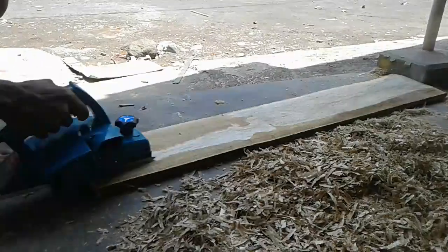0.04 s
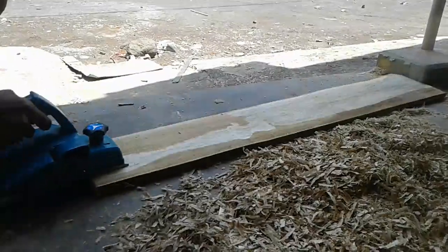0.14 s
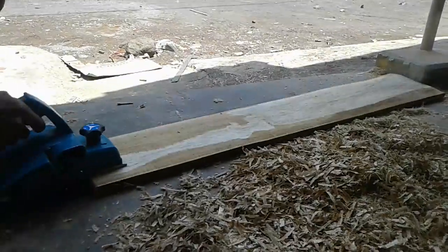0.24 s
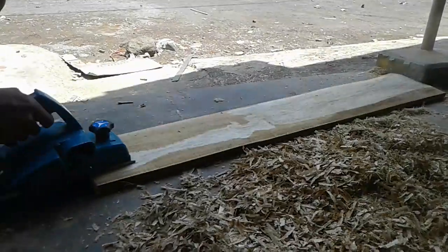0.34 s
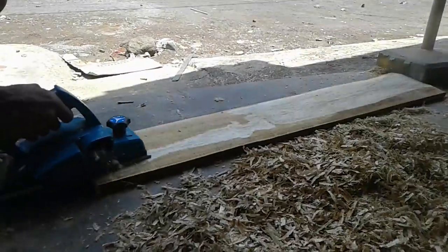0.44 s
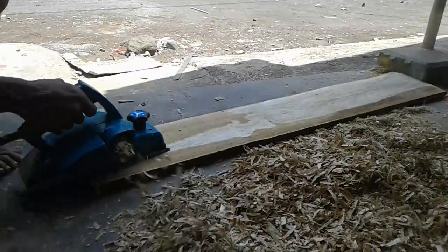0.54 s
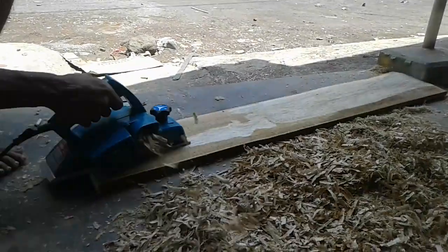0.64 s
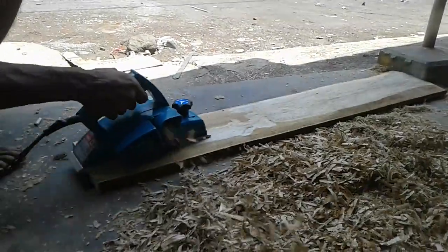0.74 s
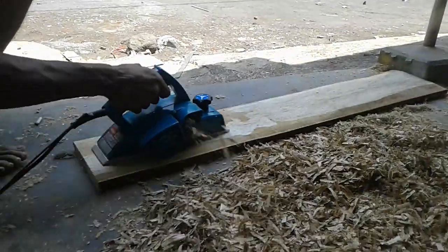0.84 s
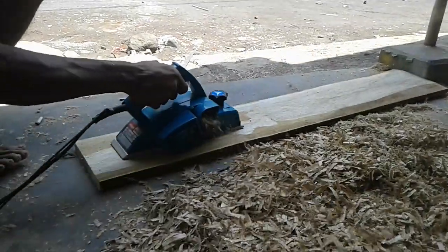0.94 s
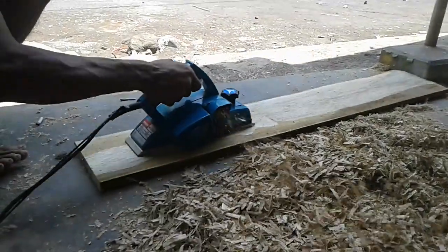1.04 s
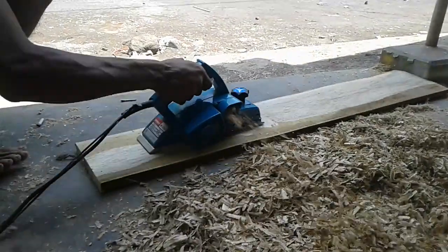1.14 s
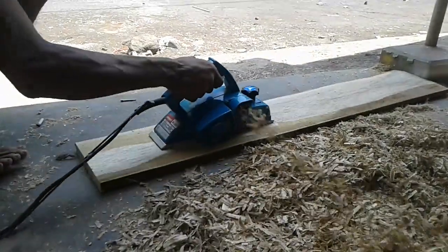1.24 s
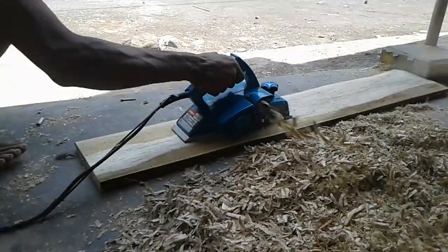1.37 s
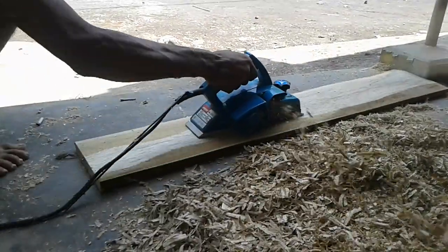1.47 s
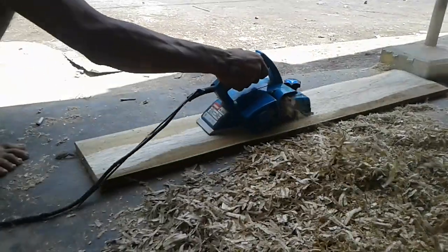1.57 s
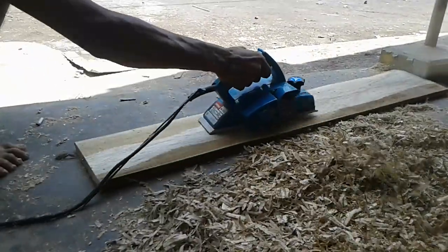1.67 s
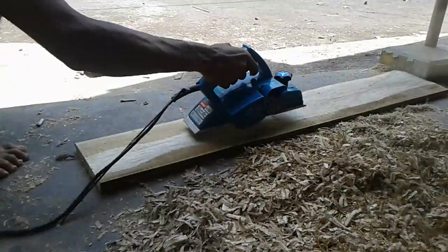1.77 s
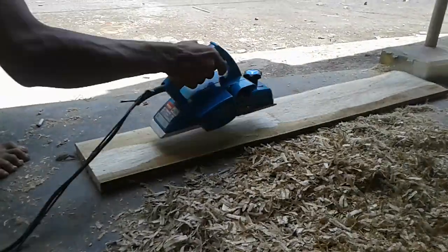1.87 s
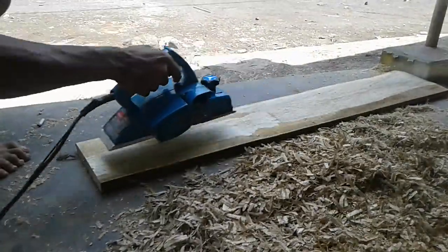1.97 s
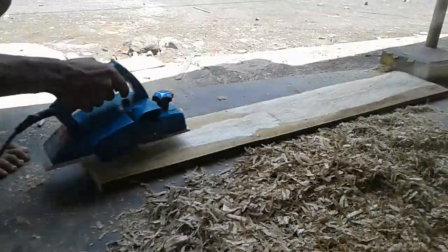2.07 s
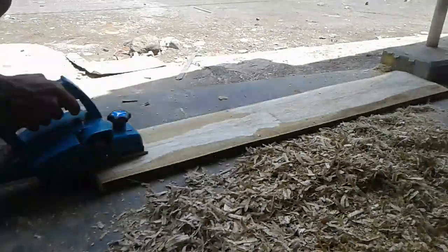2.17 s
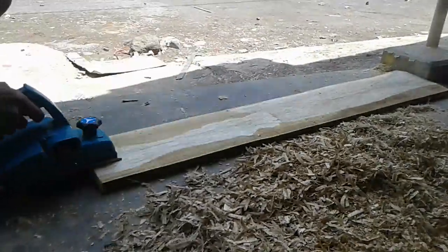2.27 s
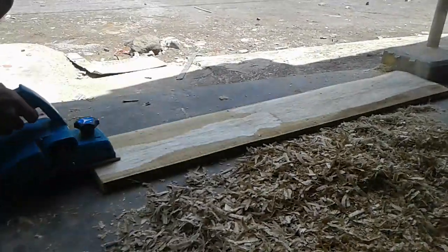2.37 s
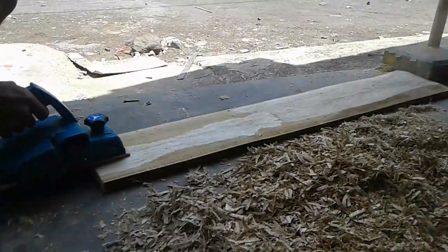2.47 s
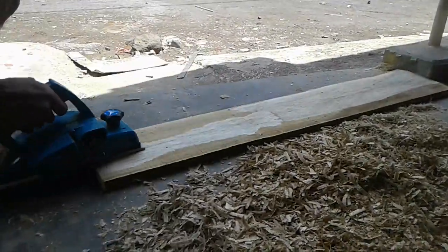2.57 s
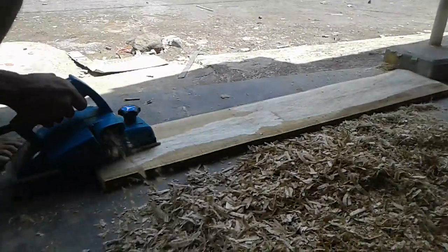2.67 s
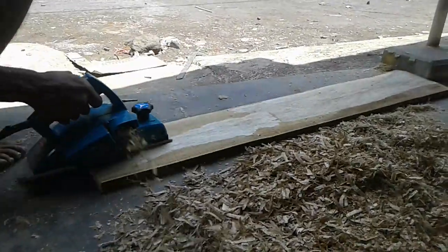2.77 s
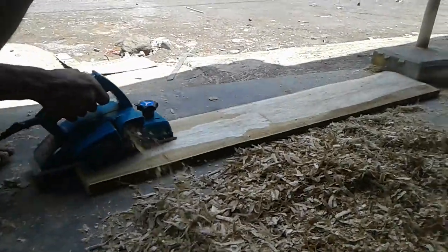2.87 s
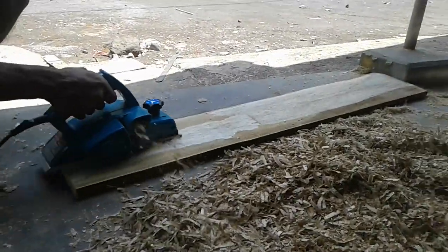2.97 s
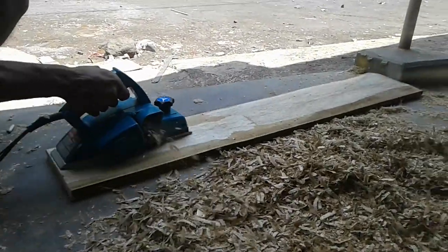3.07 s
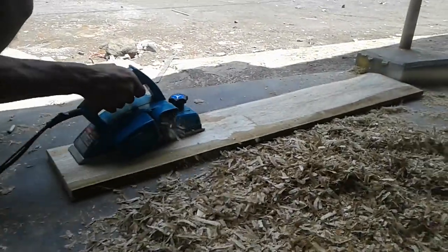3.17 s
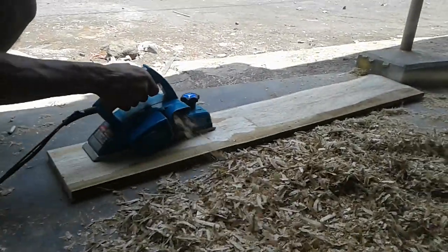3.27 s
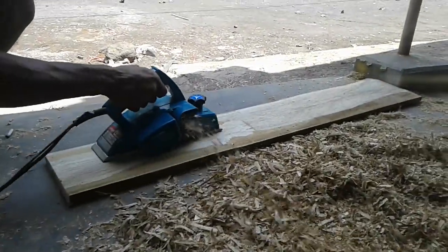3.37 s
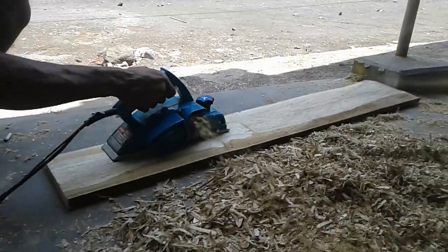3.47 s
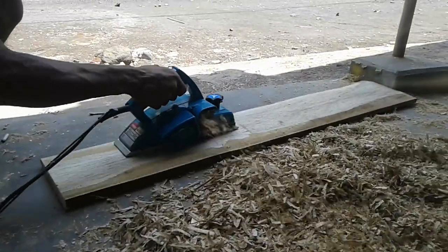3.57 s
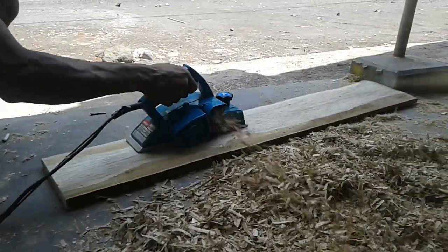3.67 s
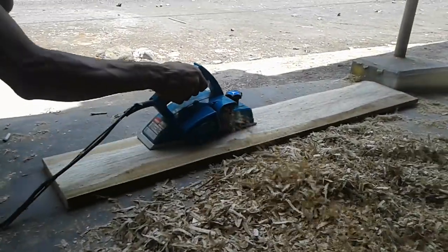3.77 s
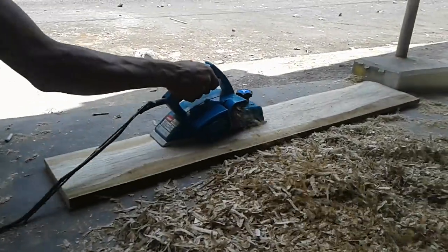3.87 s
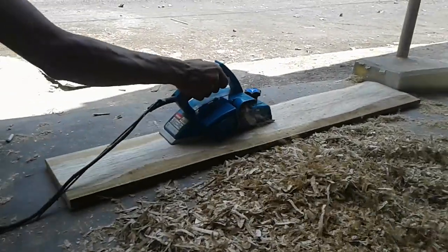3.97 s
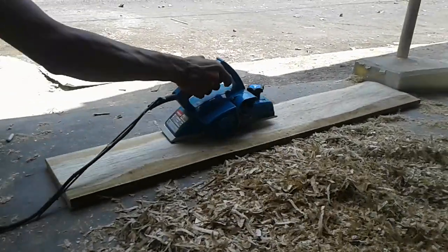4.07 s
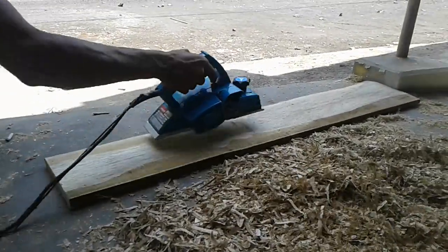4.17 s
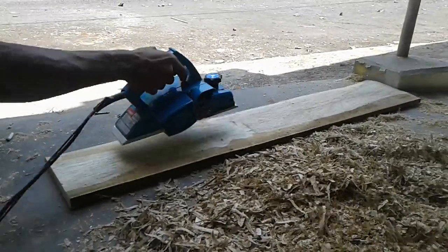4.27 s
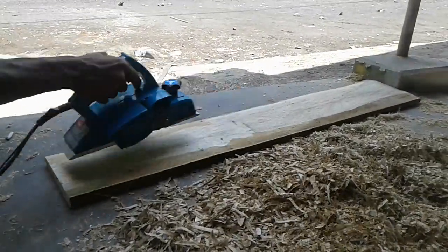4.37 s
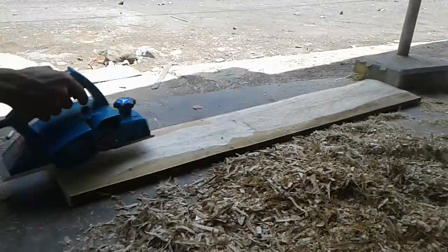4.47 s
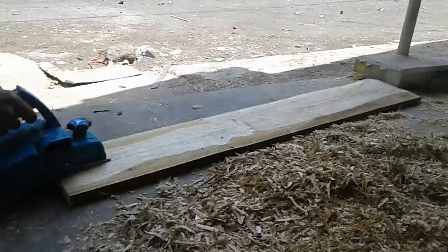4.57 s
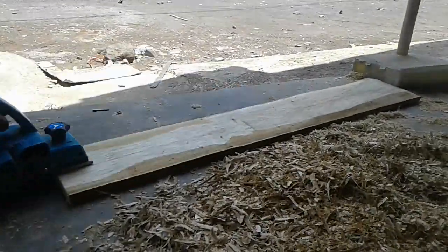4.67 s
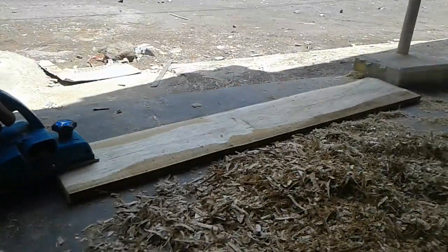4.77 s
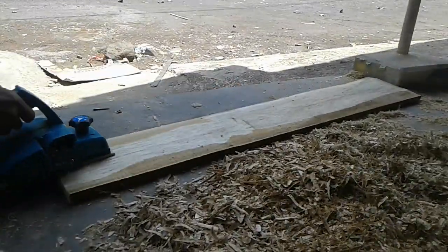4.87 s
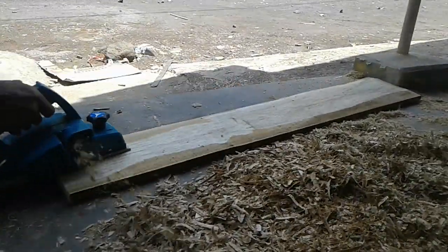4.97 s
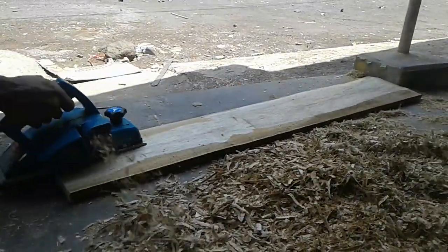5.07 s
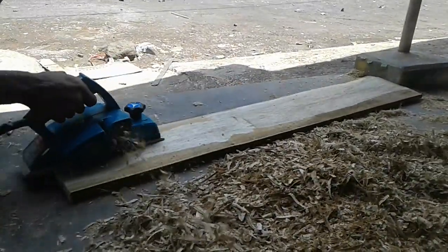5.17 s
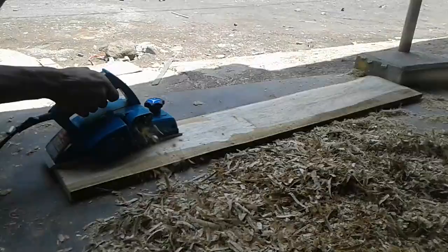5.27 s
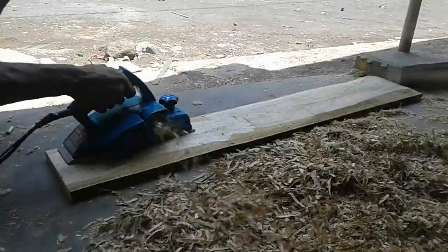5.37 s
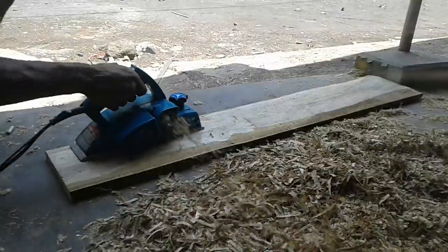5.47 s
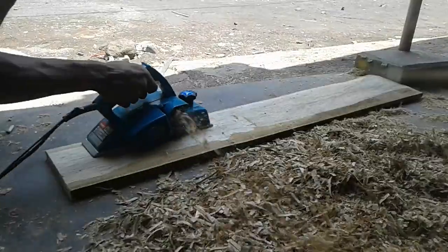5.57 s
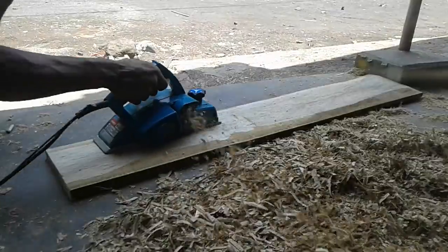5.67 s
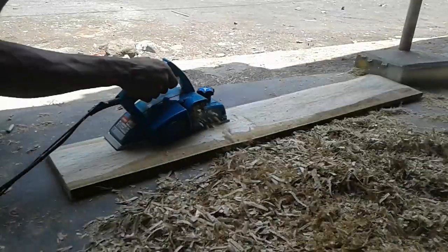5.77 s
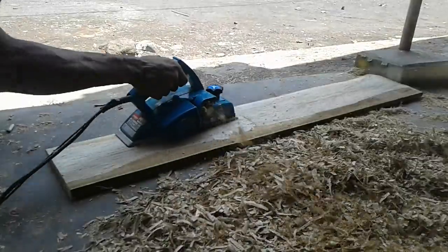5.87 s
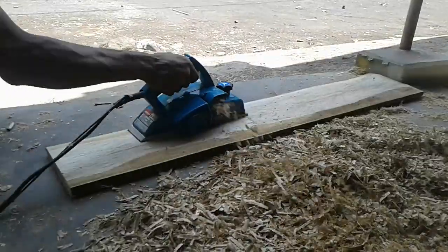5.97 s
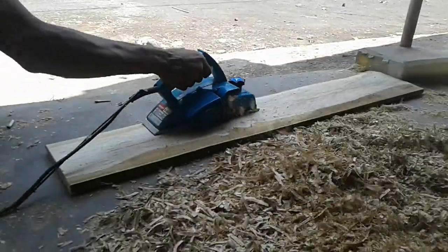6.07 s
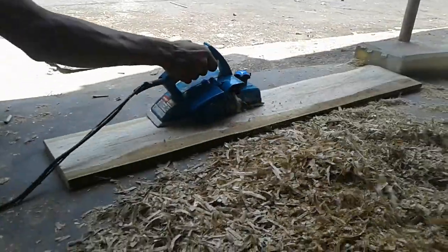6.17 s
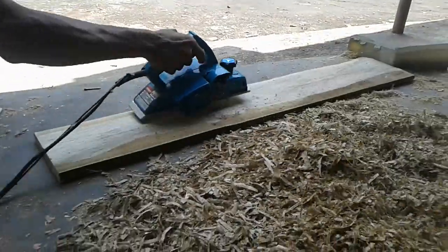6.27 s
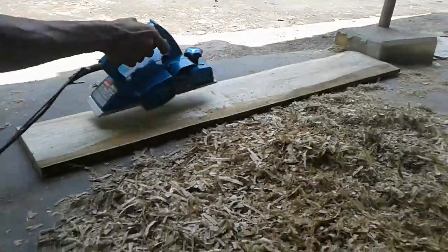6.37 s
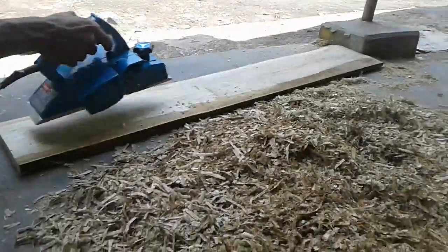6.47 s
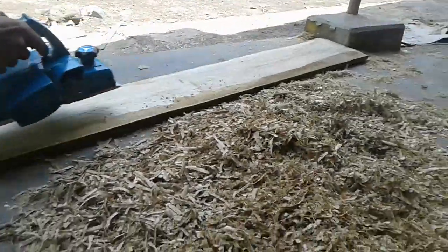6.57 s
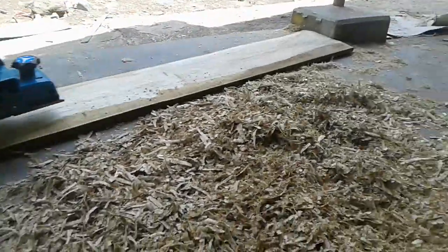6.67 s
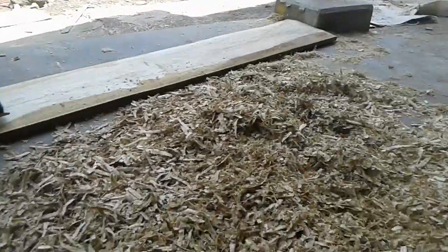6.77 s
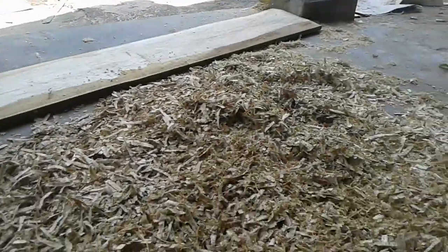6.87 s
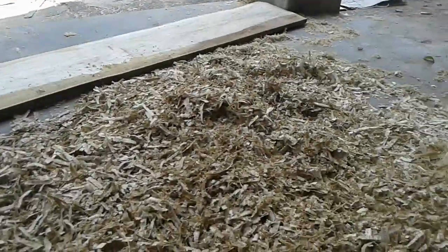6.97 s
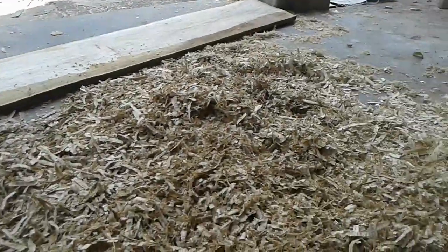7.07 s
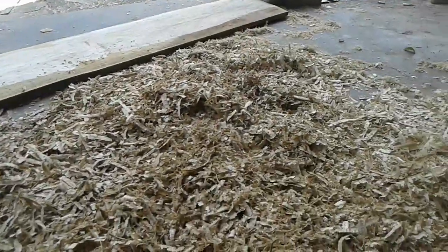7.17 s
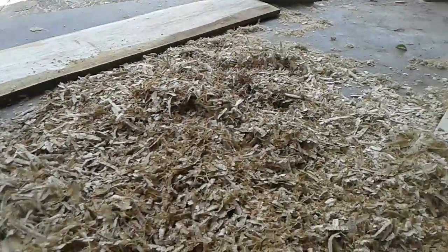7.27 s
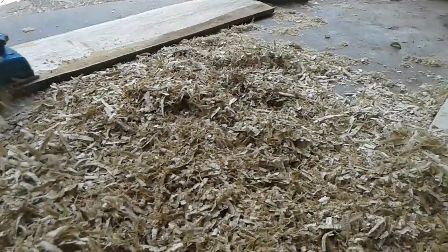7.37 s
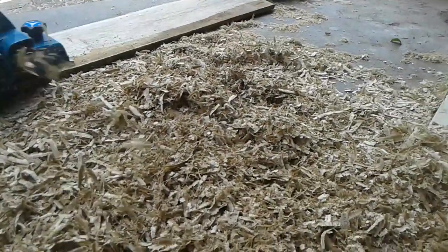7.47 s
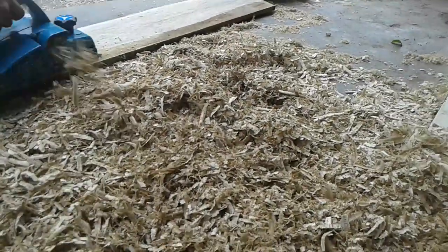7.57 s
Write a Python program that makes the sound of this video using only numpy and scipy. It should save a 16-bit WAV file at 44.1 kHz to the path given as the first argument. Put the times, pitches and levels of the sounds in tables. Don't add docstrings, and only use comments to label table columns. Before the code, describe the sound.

A hand-held power planer works along a loose wooden plank, recorded closely on a concrete porch. Each stroke starts with a quick high motor whine, then a sudden coarse roar of knives on wood with tearing fibres and spraying chips. Between strokes the drum coasts with a hollow hum, slowly falling; faint airy whistles rise before the second and third. The third cut bogs down in pitch. A distant engine approaches towards the end.

```python
import sys
import numpy as np
from scipy import signal
from scipy.fft import rfft, irfft, next_fast_len
from scipy.io import wavfile
from scipy.ndimage import uniform_filter1d

SR = 44100
rng = np.random.default_rng(int(sys.argv[2]) if len(sys.argv) > 2 else 0)


def amp(db):
    return 10 ** (np.asarray(db, float) / 20)


def write(x):
    x = np.atleast_2d(x).T
    wavfile.write(sys.argv[1], SR, np.round(np.clip(x, -1, 1) * 32767).astype(np.int16))


N = 336394
STEP = 40


def in_time(rows):
    s, *columns = np.transpose(rows)
    return [np.interp(np.arange(N) / SR, s, c) for c in columns]


def rms_one(x):
    return x / np.sqrt(np.mean(x ** 2) + 1e-20)


def slow_chance(rate, count):
    r = np.exp(-2 * np.pi * STEP * rate / SR)
    noise = rng.standard_normal((count, N // STEP + 2002))
    slow = signal.lfilter([1], [1, -2 * r, r * r], noise)[:, 2000:]
    return slow / np.std(slow, axis=1, keepdims=True)


def stretch(slow):
    between = np.arange(STEP, dtype=np.float32) / STEP
    return (slow[:-1, None] + np.diff(slow)[:, None] * between).ravel()[:N]


def drift(rate):
    return stretch(slow_chance(rate, count=1)[0])


def colour(x, spectrum):
    hz, db = np.transpose(spectrum)
    grid = np.maximum(np.arange(2049) * SR / 4096, 1)
    cepstrum = irfft(np.log(amp(np.interp(np.log(grid), np.log(hz), db))))
    cepstrum[1:2048] *= 2
    cepstrum[2049:] = 0
    return signal.fftconvolve(x, irfft(np.exp(rfft(cepstrum))))[:N]


def band(x, low_hz, high_hz):
    return signal.sosfilt(signal.butter(2, [low_hz, high_hz], "band", fs=SR, output="sos"), x)


# (t/s, fifth order f/Hz, level/dB of the fifth)
ENGINE_PASSAGE = [(.34, 141, -58), (.7, 141, -45), (2.0, 141, -51), (2.2, 130, -37), (2.3, 128, -54),
                  (2.4, 131, -41), (2.55, 132, -49), (2.8, 135, -45), (4.1, 141.7, -40), (4.7, 144.5, -45),
                  (5.8, 149.4, -38.5), (6.4, 149, -39), (7.14, 144, -32), (7.4, 144, -37.5),
                  (7.63, 144, -28.5)]
# (multiple of the firing rate, level/dB against the fifth)
EXHAUST_ORDERS = [(2, -24), (3, -33.5), (4, -12), (5, 0.5), (6, -12), (7, -17.5), (8, -32.5), (9, -16.5),
                  (11, -16), (13, -20), (15, -17)]
# (f/Hz, level/dB per Hz)
STREET_SPECTRUM = [(26, -72), (45, -31), (75, -1.5), (117, -4.5), (140, 7), (194, -6), (300, -3),
                   (390, -39), (660, -120)]
# (t/s, level/dB)
STREET_LEVEL = [(0.45, -80), (0.51, -57), (1.29, -55), (2.16, -61), (2.4, -55), (2.58, -69), (4.29, -77),
                (4.55, -58), (6.32, -58), (6.36, -53), (7.22, -52), (7.6, -48)]


def passing_engine():
    fifth_hz, level_db = in_time(ENGINE_PASSAGE)
    street_db = 8.5 + in_time(STREET_LEVEL)[0]
    firings = np.cumsum(fifth_hz / 5) / SR
    exhaust = np.zeros(N)
    for k, db in EXHAUST_ORDERS:
        level = stretch(amp(db + 1.2 * slow_chance(4.1, count=1)[0]))
        exhaust += level * np.sin(2 * np.pi * (k * firings + rng.random()))
    rumble = rms_one(colour(rng.standard_normal(N), STREET_SPECTRUM))
    return np.sqrt(2) * amp(level_db) * exhaust + amp(street_db + 2.0 * drift(14.0)) * rumble


def porch(x):
    t60_s, wall_cut_hz = 0.26, 20700
    size = next_fast_len(N + SR)
    hz = np.arange(size // 2 + 1) * SR / size
    dull = 1 / (1 + 1j * hz / wall_cut_hz)
    echoes = 0
    for k, lag_s in enumerate(rng.uniform(.006, .03, 8)):
        loop = amp(-60 * lag_s / t60_s) * dull * np.exp(-2j * np.pi * hz * lag_s)
        echoes = echoes + (-1) ** k * loop / (1 - loop)
    return irfft(rfft(x, size) * echoes, size)[:N]


# (t/s, length/s, level/dB)
SOLE_LOWERINGS = [
    (2.117, 0.37, -46),
    (4.55, 0.44, -46.5),
]


def gap_whistle():
    from_hz, to_hz = 3850, 4440
    t, out = np.arange(N) / SR, 0
    for s, length, db in SOLE_LOWERINGS:
        done = np.clip((t - s) / length, 0, 1)
        hz = from_hz + (to_hz - from_hz) * np.sqrt(done)
        tone = np.sin(2 * np.pi * np.cumsum(hz) / SR)
        out = out + amp(db) * np.sin(np.pi * done) * drift(70) * tone
    return out


# (t/s, turns per s)
POWERED_SPEED = [
    [(.52, 201.2), (.67, 201.3), (.97, 211.8), (1.16, 206.2), (1.42, 188), (1.645, 190), (1.685, 181.8),
     (1.755, 182), (1.795, 200.3)],
    [(2.685, 209.5), (2.78, 204.5), (2.92, 203.9), (3.25, 215.8), (3.6, 194.8), (3.75, 180.8), (3.9, 189.2),
     (4.16, 195.8), (4.195, 200)],
    [(4.97, 199.5), (5.08, 192.3), (5.36, 196.2), (5.52, 189.3), (5.72, 183), (5.9, 162), (6.02, 160.5),
     (6.24, 195), (6.285, 199.3)],
    [(7.14, 171.5), (7.34, 183), (7.44, 192.6), (7.51, 194.6), (7.63, 184)],
]
TRIGGER_PULLS = [.402, 2.467, 4.822, 7.095]


def drum_speed():
    coast_s, first_turns = 3.75, 196.3
    rows, released = [(0, first_turns)], (0, first_turns)
    for on, powered in zip(TRIGGER_PULLS, POWERED_SPEED):
        for s in np.linspace(released[0], on, 5)[1:]:
            rows.append((s, released[1] * np.exp((released[0] - s) / coast_s)))
        rows += powered
        released = powered[-1]
    return uniform_filter1d(in_time(rows)[0], size=1500)


RUN_UP_S = [0.028, .075, .05, .012]
RUN_UP_DB = [-31, -32.5, -33, -34]


def motor_state():
    loaded_db, release_db = -40, -47.5
    air_powered_db, air_cut_db, air_coast_db = -36, -38.5, -41
    throb_powered, throb_coast = .6, 0.07
    rows, off = [], 0
    for on, rise_s, surge_db, powered in zip(TRIGGER_PULLS, RUN_UP_S, RUN_UP_DB, POWERED_SPEED):
        bite = max(powered[0][0], on + rise_s + .001)
        rows += [(off, release_db, air_coast_db, throb_coast),
                 (on, release_db, air_coast_db, throb_coast),
                 (on + rise_s, surge_db, air_coast_db + 5.0, throb_powered),
                 (bite, surge_db, air_powered_db, throb_powered),
                 (bite + 0.025, loaded_db, air_powered_db, throb_coast),
                 (powered[-1][0] - .075, loaded_db, air_cut_db, throb_coast)]
        off = powered[-1][0]
    return in_time(rows)


BELT_LEAD = [0.0115, .012, .035, 0.0032]


def belt_slip():
    t, lead = np.arange(N) / SR, 0
    for on, powered, slip in zip(TRIGGER_PULLS, POWERED_SPEED, BELT_LEAD):
        bite, turns_per_s = powered[0]
        run_up = np.clip((t - on) / (bite - on), 0, 1)
        lead = lead + np.sin(np.pi * run_up) * turns_per_s * slip
    return np.cumsum(lead) / SR


# (f/Hz, level/dB per Hz)
COOLING_AIR = [(88, -33), (150, -10), (230, -12), (302, -19), (359, -6.5), (404, -8), (722, -10),
               (1450, -15), (1910, -18), (2760, -20.5), (4060, -16.5), (6110, -34.5), (15500, -45)]


def motor(turns):
    whine_per_turn, mains_throb_hz, octave_db = 21.35, 100, -29
    whine_db, air_db, throb = motor_state()
    pulse = 1 + np.clip(throb, 0, 1) * np.sin(2 * np.pi * mains_throb_hz * np.arange(N) / SR)
    waver = (0.068 + 0.14 * throb ** 2) * drift(38)
    slots = 2 * np.pi * (whine_per_turn * (turns + belt_slip()) + waver)
    tone = np.sin(slots) + amp(octave_db) * np.sin(2 * slots)
    whine = pulse * amp(whine_db + (2.5 + 1.5 * throb) * drift(28)) * tone
    ruffle = 1 + 0.3 * np.sin(4 * np.pi * turns)
    air = rms_one(colour(rng.standard_normal(N), COOLING_AIR)) * ruffle
    hiss = rms_one(band(rng.standard_normal(N), 6800, 7200))
    sparks = throb ** 2 * amp(whine_db - 19.0) * hiss
    return whine + sparks + amp(air_db + 0.46 * drift(3.8)) * air


# (multiple of the turn rate, level/dB)
CHOPPED_AIR_ORDERS = [(1, -20), (2, -2), (3, -21.5), (4, -11), (5, -24.5), (6, -2), (7, -24), (8, -13),
                      (9, -24.5), (10, -19.5), (11, -25.5), (12, -21), (13, -27), (14, -40), (15, -29),
                      (16, -39), (17, -32), (18, -32), (19, -33), (20, -38)]
# (f/Hz, level/dB)
CASING_RESPONSE = [(325, -38.5), (390, -30), (680, -42), (790, -41.5), (970, -43), (1020, -34), (1065, -40),
                   (1170, -32)]


def free_drum(turns, turn_hz):
    hz, casing_db = np.transpose(CASING_RESPONSE)
    out = np.zeros(N)
    for k, db in CHOPPED_AIR_ORDERS:
        if k in (2, 4, 6):
            level = amp(np.interp(k * turn_hz, hz, casing_db) + 1.3 * drift(4))
        else:
            level = stretch(amp(-32.5 + db + 5.7 * slow_chance(6.1, count=1)[0]))
        out += level * np.sin(2 * np.pi * (k * turns + rng.random()))
    return out


# (t/s, level/dB, brightness/dB)
CUT_DEPTH = [
    [(0.56, -16.5, -3.5), (0.76, -21, -1.5), (1.042, -19.5, -2), (1.302, -20.5, -0.5), (1.398, -15.5, -2.5),
     (1.558, -19.5, -2), (1.66, -16, 0), (1.71, -22, 1)],
    [(2.7, -16.5, -1.5), (2.75, -20, 5), (2.774, -20.5, -4.5), (2.94, -20, -1), (3.018, -22, -1),
     (3.358, -17.5, 2), (4.1, -19, -3)],
    [(4.99, -18.5, 1), (5.146, -26, 4), (5.216, -22, 3), (5.332, -21.5, -2.5), (5.404, -21.5, 5),
     (6.044, -21, 2.5), (6.22, -23.5, 3.5)],
    [(7.15, -20.5, 1), (7.164, -18.5, 1), (7.236, -23.5, -3), (7.316, -19, 2), (7.482, -23.5, 4),
     (7.512, -18, 5.5), (7.628, -21, 3)],
]
BITE_LENGTHS = [0.048, 0.036, 0.041, 0.023]
# (delay/s, length/s, level/dB)
LOOSE_END = [(0.13, 0.39, -30.5), (0.093, .6, -32), (0.0091, 0.39, -34), (.02, 0.46, -35)]


def cut_course():
    lift_s, clear_db = 0.049, -21.5
    tear, tear_at_bite, tear_at_lift, tear_edge_s = .03, 0.088, 0.3, 0.043
    ramp_s, held_db = 0.16, -42
    rows, edges, drums = [], [], []
    for one, bite_s, (delay, length, db) in zip(CUT_DEPTH, BITE_LENGTHS, LOOSE_END):
        (a, a_db, a_tilt), (b, b_db, b_tilt) = one[0], one[-1]
        rows += [(a - bite_s - .01, -90, a_tilt), (a - bite_s, a_db + clear_db, a_tilt), *one,
                 (b + lift_s, b_db + clear_db, b_tilt), (b + lift_s + 0.073, -90, b_tilt)]
        edges += [(a, tear_at_bite), (a + tear_edge_s, tear), (b - tear_edge_s, tear),
                  (b - tear_edge_s / 2, tear_at_lift), (b + lift_s, tear_at_lift)]
        start, settled = a + delay, a + delay + length + ramp_s
        drums += [(start - ramp_s, -60), (start, db), (start + length, db), (settled, held_db),
                  (max(b, settled) + .001, held_db), (b + 0.36, -70)]
    return *in_time(rows), *in_time(edges), *in_time(drums)


def into_pass():
    rows = []
    for one in CUT_DEPTH:
        bite, lift = one[0][0], one[-1][0]
        rows += [(bite, 0, 0), (lift, lift - bite, 1), (lift + 0.21, lift - bite, 1)]
    return in_time(rows)


# (f/Hz, level/dB per Hz)
BOARD_RESPONSE = [(150, -21), (540, -3.5), (830, 0), (1300, 2), (2000, -1), (2600, -2), (3400, -6),
                  (4500, -9), (5100, -13.5), (5700, -25), (6500, -20), (8000, -28), (10000, -33.5),
                  (15500, -44)]
# (f/Hz, width/Hz, level/dB at the start of a pass, level/dB at its end)
BOARD_MODES = [(548.5, 31, 6.5, 9), (620, 14, -5.5, 25), (734, 90, 9.5, 1.5), (846, 35, 0.5, 18.5),
               (920, 120, 1, 8.5), (1050, 60, -0.5, -5), (1160, 19, 13, 5.5), (1193, 12, 5, 3.5),
               (1348, 140, 9.5, -3.5), (1424, 27, 2.5, 3.5), (1491, 60, -19, 1), (1600, 270, 0.5, -6),
               (1912, 130, 0.5, 6.5), (2538, 37, 1, 7.5)]
# (t/s, length/s, f/Hz, level/dB)
LOCKED_OVERTONES = [(0.583, 0.03, 1220, 0), (0.606, 0.081, 790, -19), (1.51, 0.14, 1340, 5.5),
                    (1.152, 0.19, 3170, 10.5), (1.5, 0.13, 560, -3.5), (2.654, 0.067, 1230, 6),
                    (2.812, 0.11, 865, -18), (2.844, 0.17, 1225, 2), (2.877, 0.074, 612, 5),
                    (3.46, 0.062, 1240, 10.5), (3.503, .12, 1046, -16), (3.75, .1, 760, -1),
                    (5.195, 0.17, 1900, 10.5), (5.52, 0.084, 1890, 10), (5.27, 0.076, 1150, -4),
                    (5.743, 0.6, 516, 10.5), (6.1, 0.21, 1720, 7), (6.1, 0.17, 1050, 6),
                    (7.5, 0.12, 1160, -14), (7.194, 0.048, 1370, -1)]


def board_level(order, slow_hz, swell):
    ringing_orders, lock_width_hz = 20, 140
    hz, db = np.transpose(BOARD_RESPONSE)
    level_db = np.interp(np.log(order * slow_hz + 1), np.log(hz), db)
    level_db += 3 * swell * np.where(order > 10, 1.45, 1)
    t = np.arange(len(slow_hz)) * STEP / SR
    done = np.interp(t * SR, np.arange(N), into_pass()[1])
    low_hz = order[:ringing_orders] * slow_hz
    for hz, width, start_db, end_db in BOARD_MODES:
        mode_db = start_db + (end_db - start_db) * done
        level_db[:ringing_orders] += mode_db / (1 + (2 * (low_hz - hz) / width) ** 2)
    for s, length, hz, db in LOCKED_OVERTONES:
        nearness = ((t - s) / length) ** 2 + ((low_hz - hz) / lock_width_hz) ** 2
        level_db[:ringing_orders] += db * np.exp(-nearness)
    return level_db


EASY_TURNS = 172.5
KNIFE_PART_EDGES = [1500, 2600, 5400]


def knives(turns, turn_hz):
    top_order, second_knife = 60, 0.059
    order = np.arange(top_order)[:, None]
    own, slip = slow_chance(7, count=top_order), slow_chance(3.97, count=top_order)
    shared = uniform_filter1d(slow_chance(5.4, count=top_order), size=5, axis=0)
    slow_hz = np.pad(turn_hz[::STEP], (0, own.shape[1]), "edge")[:own.shape[1]]
    level_db = board_level(order, slow_hz, 0.74 * own + 0.43 * shared)
    weights = amp(level_db) * (1 + second_knife * (-1) ** order) * np.exp(.8j * slip)
    late = 0.02986 * np.maximum(26.82 - order, 0) ** 2
    weights = (weights * np.exp(1j * late)).astype(np.complex64)
    chatter = 1 + .16 * np.maximum(EASY_TURNS - turn_hz, 0)
    scattered = turns + .0015 * chatter * drift(39.2)
    turn = np.exp(2j * np.pi * scattered).astype(np.complex64)
    parts, overtone = np.zeros((4, N), np.float32), turn ** 2
    for k in range(3, top_order):
        overtone = overtone * turn
        part = np.searchsorted(KNIFE_PART_EDGES, k * turn_hz.mean())
        parts[part] += (stretch(weights[k]) * overtone).real
    return [rms_one(p) for p in parts]


FLOOR_LAGS = [0.000292, 0.000302, .0003, 0.000086]
CHIPS_BY_PASS = [-0.5, -1, -0.5, 1.5]


def flying_chips(top, fibres, depth_db):
    since, i = into_pass()[0], np.arange(N)
    which = np.searchsorted([one[-1][0] + .3 for one in CUT_DEPTH], i / SR)
    chips = 1.2 * top + amp(2.2 * drift(29)) * rms_one(band(fibres, 8160, 16500))
    lag = SR * np.take(FLOOR_LAGS, which) * (1 + .15 * since)
    echo = .45 * np.interp(i - lag, i, chips)
    chips = amp(1.34 * drift(86)) * (chips + echo)
    follow_db = np.minimum(0.1 * (depth_db + 3), 2.5 * (depth_db + 26))
    chips_db = -38.5 + np.take(CHIPS_BY_PASS, which) - 2 * since + follow_db
    return amp(chips_db - 3.5) * chips


def cut(turns, turn_hz):
    depth_db, tilt_db, tearing, thump_db = cut_course()
    low, middle, bright, top = knives(turns, turn_hz)
    burst = np.exp(-2.5 * (turns % 1)) + 0.043 * np.exp(-2.5 * ((turns + .5) % 1))
    fibres = colour(rng.standard_normal(N) * burst, BOARD_RESPONSE)
    tear = np.clip(tearing + 0.0054 * np.maximum(EASY_TURNS - turn_hz, 0), 0, 1)
    braking = np.maximum(-uniform_filter1d(np.gradient(turn_hz) * SR, size=4000), 0)
    ripping = tear + .003 * braking
    low = low + tear * rms_one(band(fibres, 260, 1500))
    middle = middle + 1.54 * tear * rms_one(band(fibres, 1700, 2230))
    bright = bright + 1.7 * ripping * rms_one(band(fibres, 3160, 4560))
    blows = amp(-5 - tilt_db) * low + amp(-6.5 + tilt_db) * middle + amp(-6.5 + .3 * tilt_db) * bright
    drumming = amp(thump_db) * np.sin(2 * np.pi * turns)
    return amp(depth_db) * blows + flying_chips(top, fibres, depth_db) + drumming


def scene():
    turn_hz = drum_speed()
    turns = np.cumsum(turn_hz) / SR
    planing = cut(turns, turn_hz)
    reverberant = planing + amp(-14) * porch(planing)
    tool = free_drum(turns, turn_hz) + motor(turns) + gap_whistle()
    return (reverberant + tool + passing_engine())[None]


def roll_off(x):
    return signal.sosfilt(signal.butter(12, 15690, fs=SR, output="sos"), x)


def record(dry):
    start_s, fade_s, ceiling = .339, 0.27, 0.43
    since = np.arange(N) / SR - start_s
    fade = (since > 0) * np.clip(0.11 + since / fade_s, 0, 1)
    thin = signal.sosfilt(signal.butter(2, 45, "high", fs=SR, output="sos"), dry)
    mix = ceiling * np.tanh(thin * fade / ceiling)
    return roll_off(mix)


dry = scene()
out = record(dry)
write(out)
```